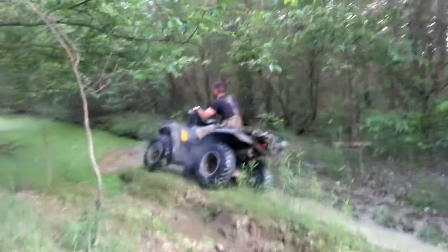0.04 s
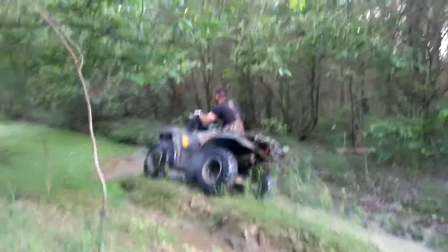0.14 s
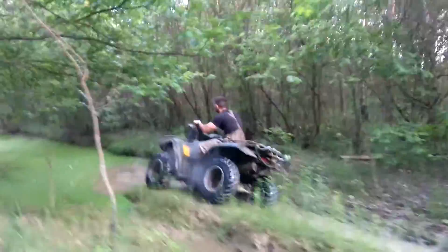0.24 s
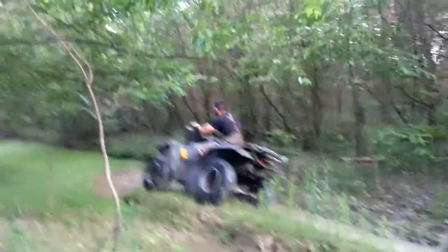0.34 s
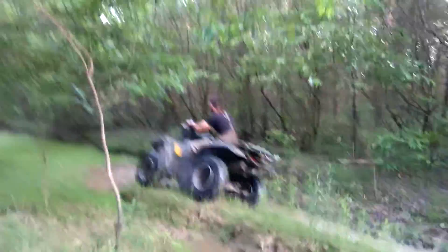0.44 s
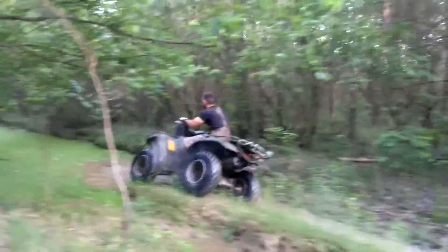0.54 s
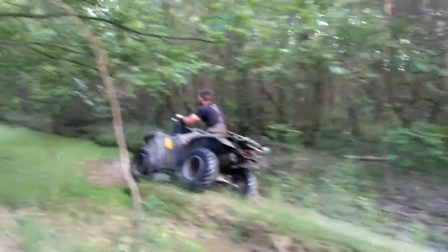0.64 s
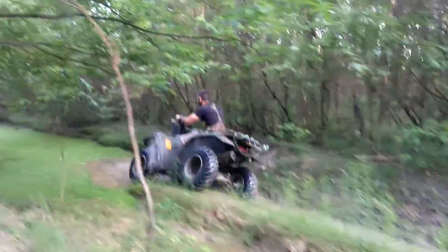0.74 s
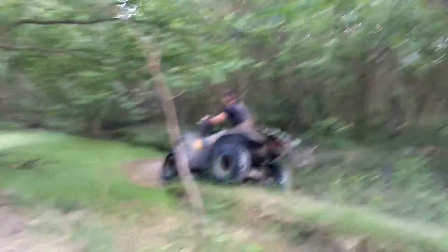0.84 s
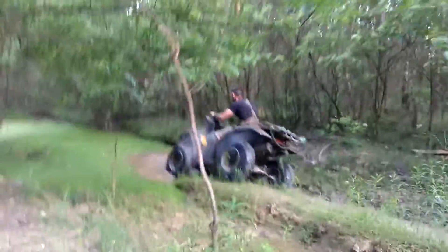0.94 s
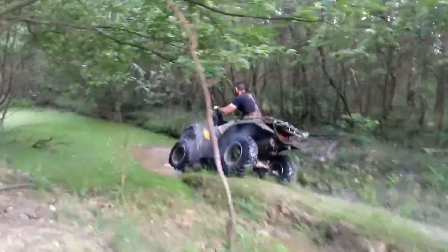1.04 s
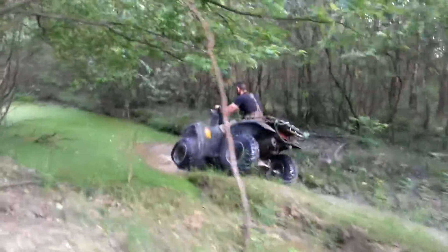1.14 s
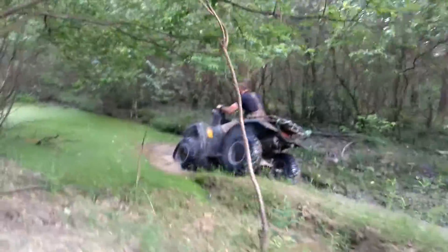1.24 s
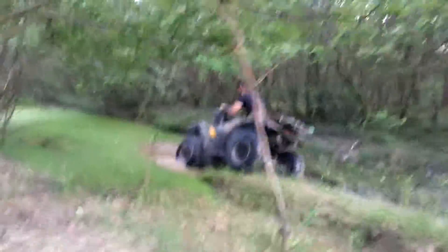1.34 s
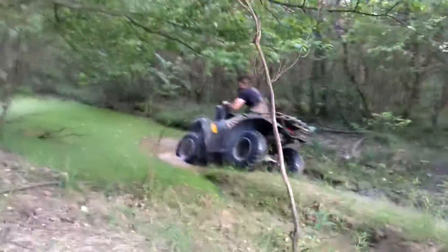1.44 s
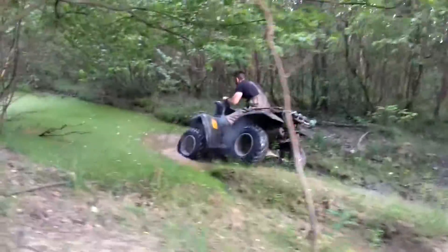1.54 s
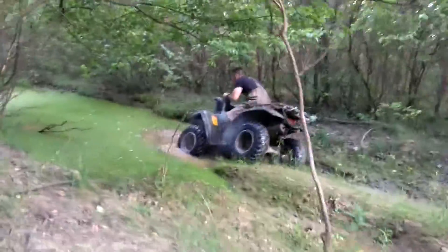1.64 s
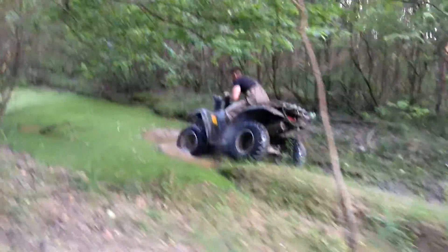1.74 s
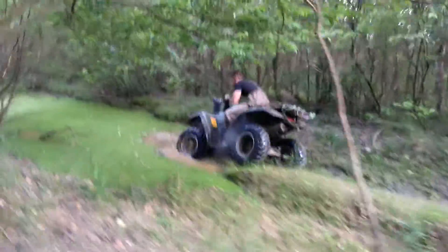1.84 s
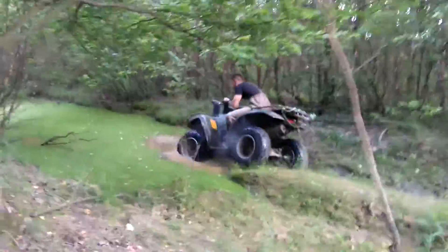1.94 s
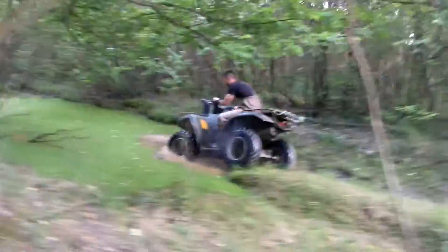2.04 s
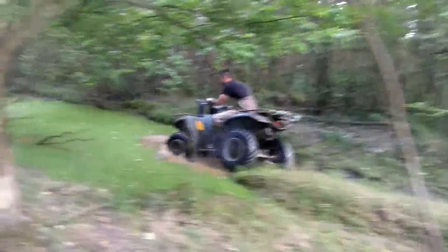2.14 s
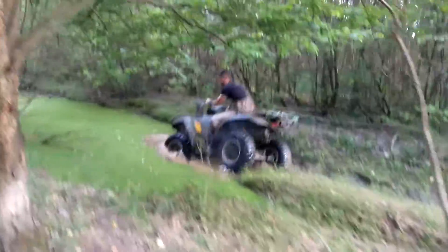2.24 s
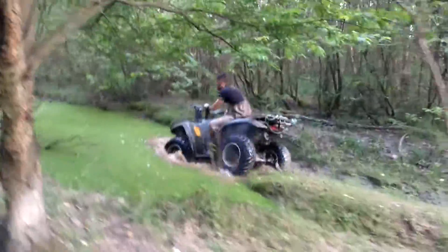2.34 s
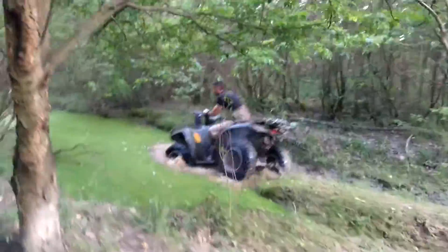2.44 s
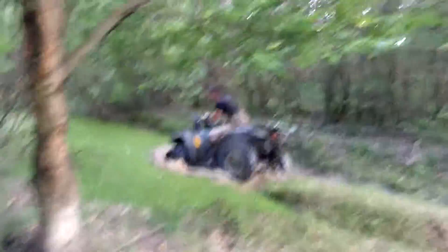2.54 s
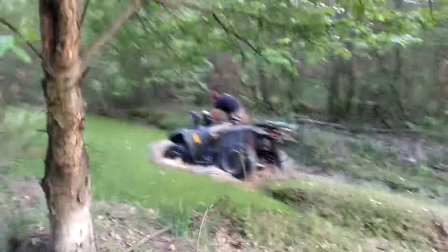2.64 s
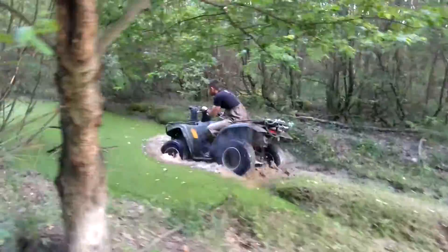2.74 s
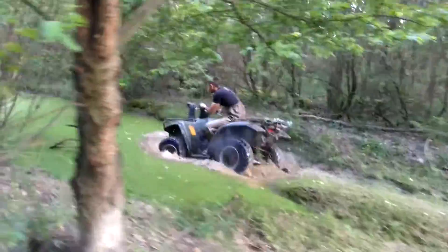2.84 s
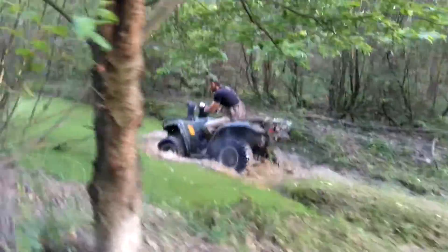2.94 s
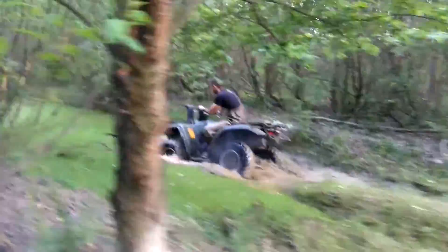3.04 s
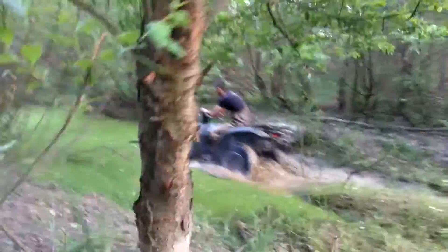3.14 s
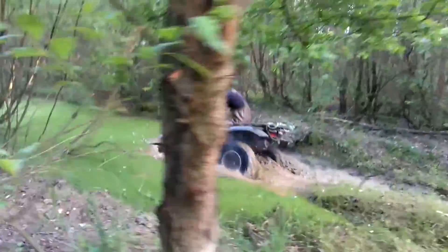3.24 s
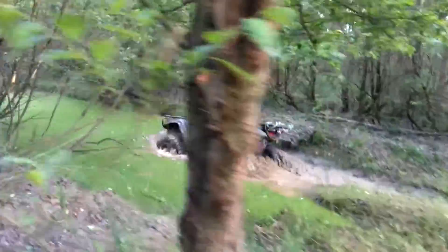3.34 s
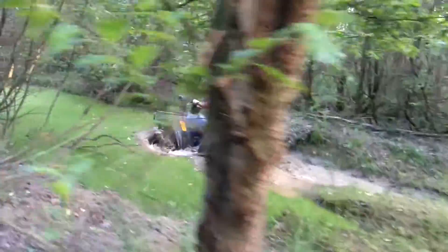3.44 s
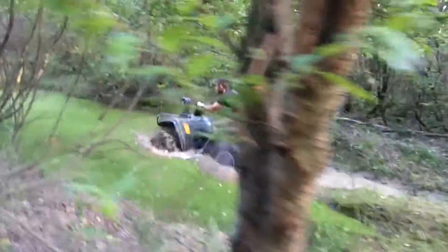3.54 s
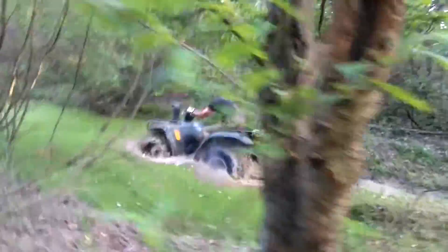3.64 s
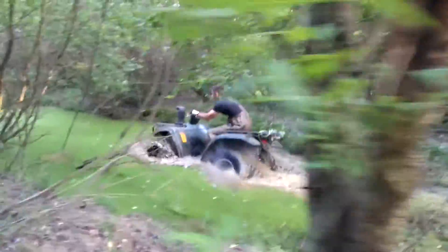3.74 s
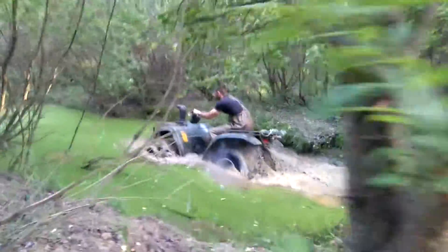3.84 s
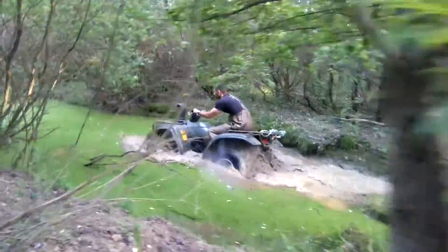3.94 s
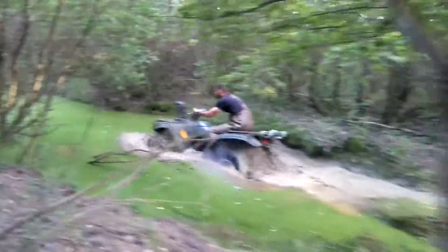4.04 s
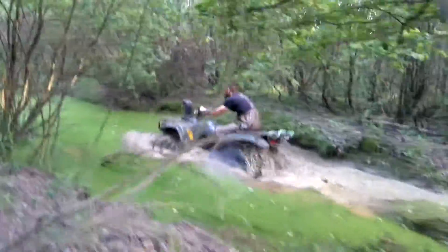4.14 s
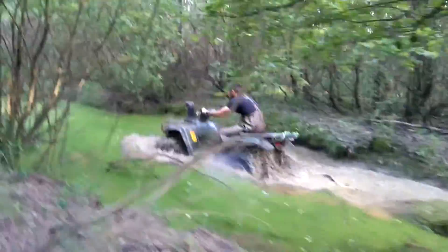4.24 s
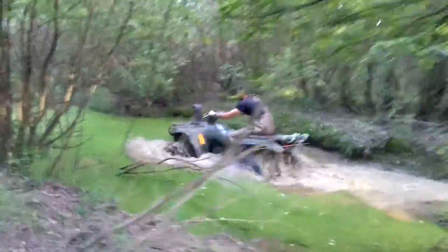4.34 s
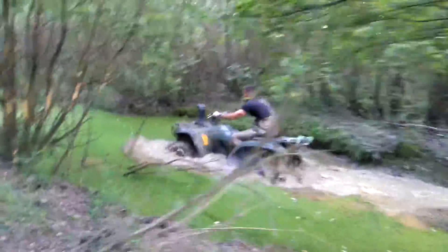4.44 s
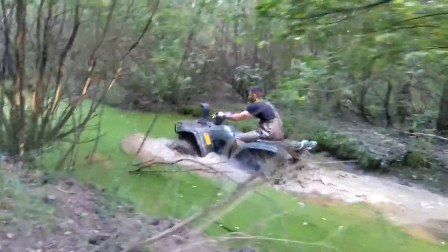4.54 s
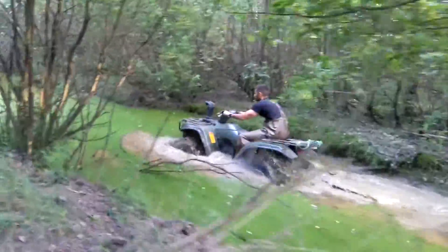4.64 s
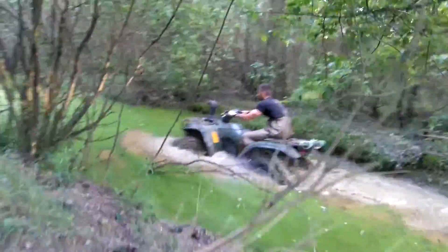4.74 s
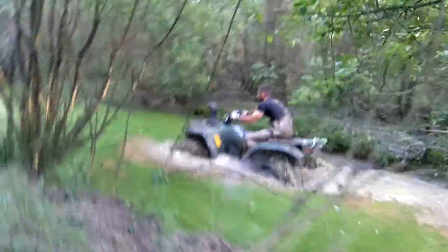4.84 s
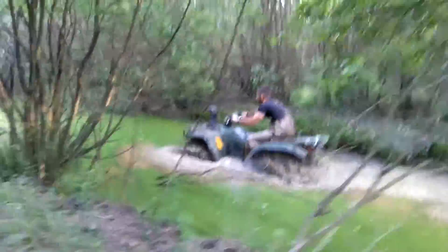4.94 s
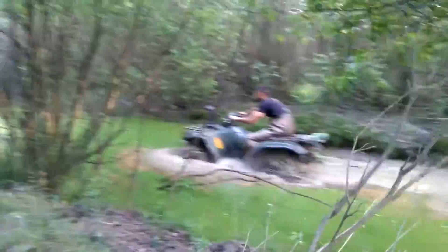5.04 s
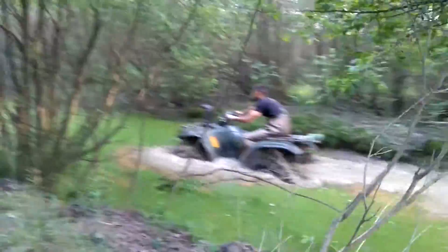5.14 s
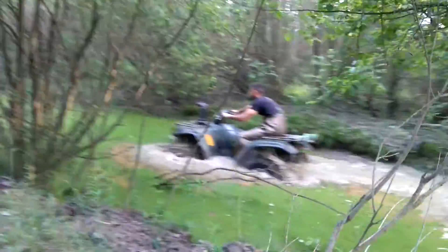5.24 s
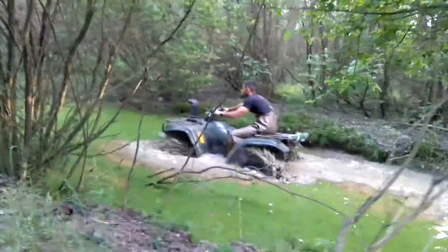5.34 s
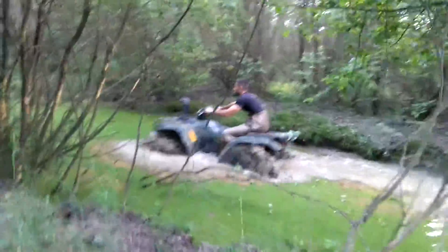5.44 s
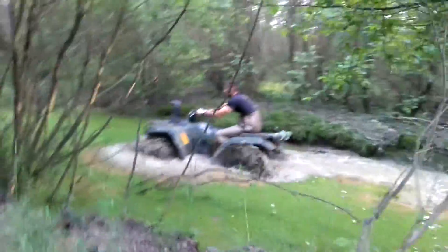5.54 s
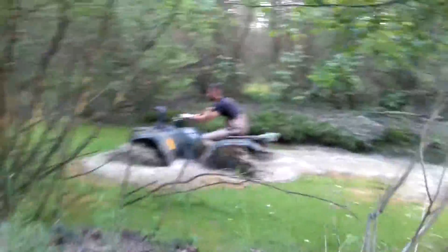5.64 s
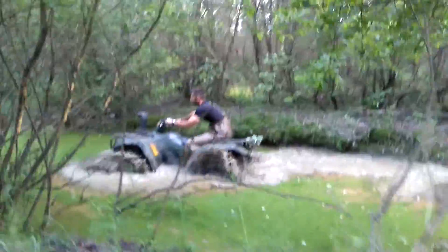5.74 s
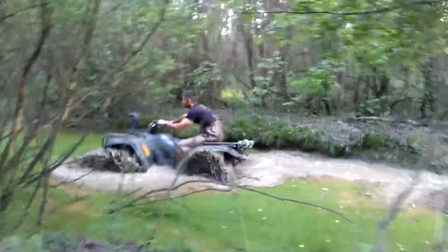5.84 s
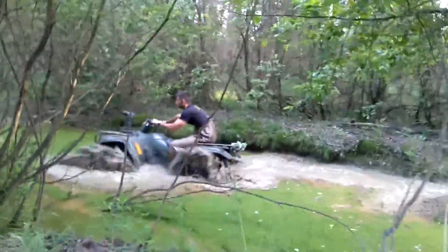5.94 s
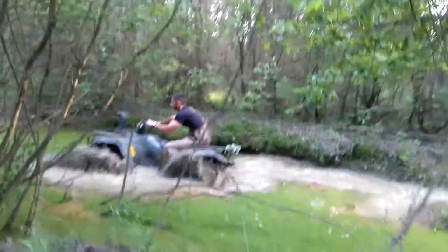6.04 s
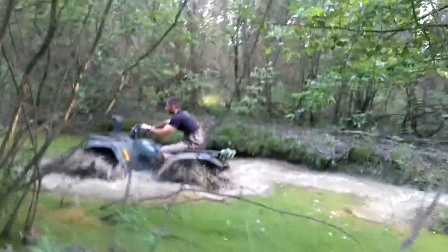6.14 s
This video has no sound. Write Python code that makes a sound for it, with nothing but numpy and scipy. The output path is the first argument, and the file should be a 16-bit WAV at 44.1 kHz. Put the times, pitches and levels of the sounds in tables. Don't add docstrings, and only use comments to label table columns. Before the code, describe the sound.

A single-cylinder quad bike blips its throttle twice, knocking and popping between, then roars hard into muddy water with churning spray in a wood.

```python
import sys
import numpy as np
from scipy import signal
from scipy.fft import rfft, irfft, next_fast_len
from scipy.io import wavfile
from scipy.ndimage import uniform_filter1d

SR = 44100
rng = np.random.default_rng(int(sys.argv[2]) if len(sys.argv) > 2 else 0)


def wav_record(signal):
    frames = np.transpose(np.atleast_2d(signal))
    bounded = np.clip(frames, -1, 1)
    quanta = np.round(bounded * 32767).astype(np.int16)
    wavfile.write(sys.argv[1], SR, quanta)


def amplitude_ratio(level_db):
    exponent = np.asarray(level_db, float) / 20
    return 10 ** exponent


N = 273420
TIME = np.arange(N) / SR
SIZE = next_fast_len(N + SR // 2)
HZ = np.arange(SIZE // 2 + 1) * SR / SIZE + 1e-3

ASPECT_S = [
    .3,
    .9,
    2.0,
    2.8,
    3.2,
    3.75,
    4.4,
    5.0,
    5.5,
    6.05,
]
# clean orders, bark, rasp, hiss and wash, all in dB.
CARRY = [(-16, -14.5, -27, -26.5, -33), (-15.5, -13.5, -26, -29.5, -31), (-16.5, -15.5, -24, -27, -32),
         (-14.5, -13, -17.5, -21.5, -27.5), (-15, -20.5, -17.5, -19, -23), (-21, -19, -17.5, -18.5, -18.5),
         (-21, -21.5, -18.5, -15.5, -18), (-19.5, -18, -19, -18.5, -17.5),
         (-17.5, -21, -22.5, -19.5, -16.5), (-16.5, -17, -22.5, -21, -21)]
# drum in dB, pipe in dB, frame in dB, bark roughness (0-1),
# left-right balance in dB.
KNOCK = [(-41, -23.5, -35, 0.64, 0), (-31.5, -23.5, -40.5, 0.66, 0.5), (-39.5, -25, -41.5, 0.76, 2.5),
         (-44, -23.5, -46, 0.34, 0), (-36, -27, -41, 0.7, 1), (-38, -28.5, -26.5, 0.15, -3.5),
         (-28.5, -27, -27.5, 0.06, -3), (-30.5, -26.5, -31, 0.13, -0.5), (-39, -48, -31, 0.2, -1),
         (-36, -44, -36, 0.14, -2.5)]
# pitch in Hz, width in Hz, level in dB.
ON_BANK = [(810, 350, 17), (970, 150, 0), (1530, 320, 10.5), (2400, 250, 14), (2780, 83, -25),
           (4860, 110, 11), (7080, 100, -39)]
# pitch in Hz, level in dB per Hz.
JET_COLOUR = [(240, 18), (400, 5.5), (867, 6.5), (1090, 9), (1590, 2.5), (2190, -3), (2510, -1.5),
              (8060, 1), (12700, -17), (14300, -13), (15000, -49)]
EVEN_DB = 1.2


def in_time(rows):
    s, *columns = np.transpose(rows)
    return [np.interp(TIME, s, column) for column in columns]


def by_aspect(rows):
    return in_time(np.column_stack([ASPECT_S, rows]))


def aspect_shares():
    return [np.interp(TIME, ASPECT_S, row) for row in np.eye(len(ASPECT_S))]


def at_hz(points, hz=HZ):
    given_hz, value = np.array(points).T
    return np.interp(np.log(hz), np.log(given_hz), value)


def through(x, response):
    return irfft(rfft(x, SIZE) * response, SIZE)[..., :N]


def modes(rows, turn=-1, hz=HZ):
    return sum(turn ** k * amplitude_ratio(db) * 1j * hz * width / (at ** 2 - hz ** 2 + 1j * hz * width)
               for k, (at, width, db) in enumerate(rows))


def band(x, low_hz, high_hz, order=2):
    return signal.sosfilt(signal.butter(order, [low_hz, high_hz], "band", fs=SR, output="sos"), x)


def evened(x, level_db):
    power = uniform_filter1d(uniform_filter1d(np.atleast_2d(x)[0] ** 2, SR // 9), SR // 9)
    return x * amplitude_ratio(level_db) / np.sqrt(power + 1e-12)


def per_cycle(number, spread_db):
    return amplitude_ratio(spread_db * rng.standard_normal(number[-1] + 1))[number]


def burst(since, rate, rise_s, fall_s):
    s = np.maximum(since, 0) / rate
    return (1 - np.exp(-s / rise_s)) * np.exp(-s / fall_s)


def gritty(shape, grit_db, grain):
    jumps = np.repeat(rng.standard_normal(N // grain + 1), grain)[:N]
    return rng.standard_normal(shape) * amplitude_ratio(grit_db * jumps)


def opening():
    # time in seconds, opening (0-1).
    throttle = [(0, 0.76), (.09, 0.89), (.61, 0.86), (.66, 0.67), (1.4, 0.43), (1.62, 0.85), (1.75, 0.96),
                (2.22, 0.91), (2.27, 0.4), (2.66, 0.2), (2.715, 0.89), (6.2, 1)]
    return np.clip(in_time(throttle)[0], 0, 1)


def driven(full_db, layer):
    # time in seconds, level in dB.
    effort = [(0, -38.5), (.12, -23), (.45, -17.5), (.6, -17.5), (.66, -26), (.76, -23), (.95, -30.5),
              (1.4, -37.5), (1.52, -36.5), (1.62, -32), (1.78, -21.5), (2.05, -17), (2.21, -18),
              (2.27, -23), (2.6, -32.5), (2.73, -22), (3.1, -17), (6.2, -17)]
    follows = dict(clean=0.81, drum=0.26, pipe=0.15, bark=1, rasp=0.73, hiss=0.93, wash=0.81)
    shut_db = dict(clean=-3, drum=12, pipe=-4, bark=-3.5, rasp=-12.5, hiss=-12.5, wash=9.5)
    below_full_db = in_time(effort)[0] + 17
    return full_db + follows[layer] * below_full_db + shut_db[layer] * (1 - opening())


def crank():
    # time in seconds, firings per second.
    speed = [(0.0, 11.35), (0.13, 15.71), (0.3, 21.66), (0.45, 24.92), (0.61, 25.8), (0.72, 20.84),
             (0.95, 18.07), (1.22, 13.83), (1.5, 12.18), (1.64, 12.28), (1.8, 18.7), (1.95, 23.05),
             (2.08, 25.58), (2.22, 25.34), (2.35, 20.52), (2.52, 17.22), (2.68, 18.25), (2.82, 23.53),
             (2.96, 28.7), (3.25, 32.53), (3.588, 37.02), (4.05, 38.6), (4.557, 38.17), (5.138, 38.9),
             (5.365, 41.75), (5.665, 40.94), (6.2, 40.92)]
    flywheel_s, first_cycle = 0.05, -0.1987
    push_cycle, push_latest_s = 0.41, 0.043
    rate = uniform_filter1d(in_time(speed)[0], round(flywheel_s * SR), mode="nearest")
    delay_s = np.interp(TIME, [2.8, 3.2], [0, 0.35 / 343])
    turned = np.cumsum(rate) / SR + first_cycle + 1 - rate * delay_s
    return turned % 1, np.minimum(push_cycle, push_latest_s * rate), rate, turned.astype(int)


def aspects(x, valley_db):
    # pitch in Hz, width in Hz, level in dB.
    revving = [(740, 170, 19), (980, 73, 13), (1660, 370, 15), (2300, 270, 15.5), (2780, 46, 14),
               (3880, 100, -11), (5040, 73, 10), (7160, 290, 6)]
    # pitch in Hz, width in Hz, level in dB.
    nosing_in = [(900, 64, -9), (1280, 580, 11.5), (2220, 84, 13.5), (3000, 170, 4), (3800, 40, -28),
                 (5100, 150, -35), (6100, 22, -19)]
    # pitch in Hz, width in Hz, level in dB.
    dropping = [(990, 130, -18), (1540, 120, 3), (2340, 94, 6), (2730, 150, 6.5), (4230, 60, -4),
                (4770, 180, 4), (6200, 46, -2), (7500, 57, 6)]
    # pitch in Hz, width in Hz, level in dB.
    wading = [(865, 32, 9), (1680, 310, 9.5), (2380, 81, 8), (3140, 430, 7.5), (3800, 640, 5.5),
              (5040, 80, 12), (5930, 32, -14), (7380, 63, -16)]
    # pitch in Hz, width in Hz, level in dB.
    sinking = [(1647, 47, 8.5), (1924, 150, 9.5), (2560, 92, 7.5), (3320, 100, -5), (3840, 510, 1),
               (4640, 370, 7), (5240, 170, 3), (6100, 190, 0)]
    # pitch in Hz, width in Hz, level in dB.
    deep = [(822, 99, 19.5), (1250, 63, 14), (2010, 220, 9.3), (2590, 280, 4.7), (3210, 310, 10.7),
            (4000, 240, 12), (5080, 290, 4.5), (6100, 210, 2)]
    # pitch in Hz, width in Hz, level in dB.
    ploughing = [(883, 23, 16), (1624, 19, 14), (2480, 46, 12), (3300, 79, 6.7), (3960, 140, 5.5),
                 (4570, 330, 3), (5100, 140, 3.9), (5900, 130, 2)]
    # pitch in Hz, width in Hz, level in dB.
    churning = [(660, 57, 6.5), (415, 66, -3), (1660, 133, -5), (1910, 280, 11), (2510, 230, 4),
                (3500, 780, 10), (4480, 130, 13.5), (5130, 110, 15), (6540, 230, -17)]
    # pitch in Hz, width in Hz, level in dB.
    leaving = [(664, 90, -7), (810, 130, 14.5), (1670, 170, 4), (2330, 140, 2), (3030, 110, -4),
               (4050, 970, 6), (6800, 110, -11)]
    # pitch in Hz, width in Hz, depth
    hollow = [(3570, 300, 0.2), (1910, 200, 0), (1880, 120, 0.1), (3500, 240, 0.1), (2750, 180, 0.5),
              (2160, 120, 0.4), (1480, 820, 0.34), (1460, 170, 0.72), (3530, 210, 0.5), (2140, 270, .95)]
    tables = [revving, ON_BANK, nosing_in, dropping, wading, sinking, deep, ploughing, churning, leaving]
    out = np.zeros_like(x)
    for share, table, (dip_hz, width, depth) in zip(aspect_shares(), tables, hollow):
        heard = np.flatnonzero(share)
        start, end = max(heard[0] - SR // 8, 0), heard[-1] + 1
        size = next_fast_len(end - start + SR // 4)
        hz = np.arange(size // 2 + 1) * SR / size + 1e-3
        colour = modes(table, turn=0.9, hz=hz) + amplitude_ratio(valley_db + at_hz(JET_COLOUR, hz))
        colour = colour * (1 - np.clip(depth, 0, 1) * modes([(dip_hz, width, 0)], hz=hz))
        coloured = irfft(rfft(x[:, start:end], size) * colour, size)[:, :end - start]
        out[:, start:end] += np.sqrt(share[start:end]) * coloured
    return out


def wood(x):
    out = np.zeros_like(x)
    lags = (rng.uniform(0.015, 0.16, 14) * SR).astype(int)
    for k, lag in enumerate(lags):
        fade = amplitude_ratio(-60 * lag / SR / 0.5)
        out[k % 2, lag:] += (-1) ** (k // 2) * fade * x[0, :-lag]
    return band(out, 97, 3800, order=1)


def passing(pair):
    # time in seconds, length in seconds, pitch in Hz, width in Hz, gain (-1 cancels).
    narrow_bands = [(2.638, 0.057, 1800, 200, -0.48), (2.85, 0.19, 690, 90, -.7), (2.898, 0.16, 3600, 250, -0.69),
                    (3.22, 0.11, 2850, 100, 1.5), (3.27, 0.23, 90, 37, -.7), (3.43, 0.098, 2750, 130, -.9),
                    (3.6, 0.23, 1620, 46, 0.87), (2.66, .2, 427, 82, 0.74), (4.55, 0.45, 514, 78, 0.46),
                    (3.57, 0.28, 2400, 90, 0.32), (3.595, 0.17, 1980, 90, 0.057), (3.3, 0.59, 630, 250, -.4),
                    (3.6, 0.34, 495, 93, 0.96), (5.7, 0.22, 430, 110, 0.63), (1.45, 0.44, 600, 270, 0.21),
                    (3.65, 0.094, 3600, 270, -1.4), (3.5, 0.17, 2100, 140, -1.1), (3.833, 0.33, 2600, 120, 0.29),
                    (4.634, 0.18, 1200, 170, 0.63), (4.88, 0.22, 2000, 300, 0.0037), (5.366, 0.098, 620, 50, 1.3),
                    (5.47, 0.23, 4000, 120, -.85), (5.55, .1, 4600, 150, -0.59), (5.68, .12, 4100, 220, -0.8),
                    (5.668, 0.073, 3800, 140, -0.99), (5.85, 0.21, 2040, 110, -.8),
                    (5.995, 0.091, 3250, 140, -.85), (6.08, 0.28, 2400, 120, -0.49),
                    (6.125, 0.061, 3200, 230, -0.52), (6.157, 0.081, 2950, 220, -0.44),
                    (0.64, 0.38, 470, 110, -0.31), (.15, 0.1, 450, 79, -0.42), (0.56, .35, 3800, 500, -0.23)]
    out = pair.copy()
    for s, length, hz, width, gain in narrow_bands:
        start, end = max(round((s - length) * SR), 0), min(round((s + length) * SR), N)
        fade = np.clip(2 - 2 * abs(np.arange(start, end) / SR - s) / length, 0, 1)
        peak = signal.iirpeak(hz, hz / width, fs=SR)
        out[:, start:end] += max(gain, -1) * fade * signal.lfilter(*peak, out[:, start:end])
    return out


def splashes():
    knots = rng.standard_normal(200)
    return np.interp(TIME * 9 * 2, np.arange(200), knots)


def wash(level_db):
    # pitch in Hz, level in dB per Hz.
    wash_colour = [(240, -81), (400, 0.5), (880, -14.5), (2390, 4.5), (4330, -5.5), (7810, -3),
                   (12500, -13), (14300, -12), (15000, -76)]
    wet_share = [0.1, 0.12, 0.88, 0.23, 0.97, 0.58, 0.64, 0.65, .9, 0.27]
    falls = rng.random((2, N)) < 1500 / SR
    drops = falls * amplitude_ratio(4.7 * np.minimum(rng.exponential(1, (2, N)), 4))
    spray = rng.standard_normal((2, N)) * (1 + 1.17 * uniform_filter1d(drops, 12) * 4.7)
    tilt = amplitude_ratio(at_hz(wash_colour) - at_hz(JET_COLOUR)) * (HZ > 300)
    sound = aspects(through(spray, tilt), valley_db=10.5)
    splash_db = 3.5 * splashes() * by_aspect(wet_share)[0]
    return evened(sound, level_db + splash_db)


def clinks(events, body):
    ticks = np.zeros(N)
    for s, peak_db in events:
        at = round(s * SR)
        ticks[at:at + 2] += amplitude_ratio(peak_db + 28) * np.array([1, -0.4])
    return through(ticks, modes(body, turn=1.0)) * [[1], [0.4]]


def loose_shield():
    # time in seconds, peak in dB.
    shield_clinks = [(0.0484, -30), (0.1191, -22), (0.181, -13), (0.2155, -18), (0.5691, -26), (2.549, -27),
                     (2.9402, -10), (2.9756, -13), (3.0654, -15)]
    # pitch in Hz, width in Hz, level in dB.
    shield = [(5110, 54, 12.5), (5050, 120, 0), (2530, 110, -12)]
    return clinks(shield_clinks, shield)


def flung_stones():
    # time in seconds, peak in dB.
    stones = [
        (0.9494, -29),
        (2.8908, -15),
        (5.1771, -10),
        (5.3747, -12),
    ]
    # pitch in Hz, width in Hz, level in dB.
    guard = [(2300, 110, 20), (2540, 180, 9), (7000, 3000, -13)]
    return clinks(stones, guard)


def pops():
    # time in seconds, peak in dB.
    fuel_pops = [(0.729, -5), (0.755, -20), (0.792, -14), (0.842, -3.5), (0.861, -33), (1.272, -11),
                 (2.337, -5.5), (2.398, -2)]
    puffs = np.zeros(N)
    for s, peak_db in fuel_pops:
        at = round(s * SR)
        puffs[at:at + 200] += amplitude_ratio(peak_db - 6.5) * rng.standard_normal(200) * np.exp(-np.arange(200) / 28.0)
    return band(through(puffs, modes(ON_BANK, turn=0.65)), 400, 3600) * [[1], [0.3]]


def zip_note(place, rate, number):
    # time in seconds, pitch in Hz, level in dB.
    notes_heard = [(0, 2620, -27.5), (.6, 2490, -16), (.7, 2530, -50), (1.7, 2400, -48), (2.1, 2880, -28),
                   (2.3, 2900, -42), (2.7, 2680, -34), (2.9, 2430, -30), (3.12, 3440, -12),
                   (3.26, 3750, -11.5), (3.47, 3960, -9), (3.6, 3950, -19), (3.9, 3500, -20),
                   (4.4, 3300, -18), (5.0, 3300, -27), (5.5, 3300, -26), (6.2, 4160, -22)]
    note_hz, note_db = in_time(notes_heard)
    since = place - 0.0025 * rate
    tone = np.sin(2 * np.pi * note_hz * per_cycle(number, 0.081) * since / rate)
    shape = burst(since, rate, 0.0012, 0.0021) * per_cycle(number, EVEN_DB)
    return amplitude_ratio(note_db + 8.0) * tone * shape * [[1], [0.5]]


def valve_zip(place, rate, number):
    s = place / rate
    start_hz, top_hz, climb_s = 1450 * per_cycle(number, 0.79), 3950 * per_cycle(number, 0.83), 0.0024
    turns = top_hz * s - (top_hz - start_hz) * climb_s * (1 - np.exp(-s / climb_s))
    return np.sin(2 * np.pi * turns) * burst(place, rate, 0.000096, 0.0028)


def jet(place, push_at, rate, number):
    slap_share = [.4, .25, .25, .3, .15, .1, .1, .1, .1, .1]
    zip_share = [0.28, 0.41, 0.92, 0.93, 1.24, 1.13, 1.2, 1.25, 0.85, 0.44]
    rasp_db, hiss_db, wash_db = by_aspect(CARRY)[2:]
    throttle_open = opening()
    open_valve = np.clip((0.74 - place) / 0.2, 0.12, 1)
    strength = per_cycle(number, 0.47) * throttle_open
    crack = burst(place, rate, 0.0002, 0.004) * strength
    swell = burst(place - push_at, rate, 0.0042, 0.0044) * per_cycle(number, 1.9)
    slap_at = np.minimum(push_at, 0.024 * rate)
    slap = burst(place - slap_at, rate, 0.00066, 0.0081) * per_cycle(number, 2 * EVEN_DB)
    slap = slap * by_aspect(slap_share)[0]
    stream = burst(place, rate, 0.003, 0.077) * open_valve
    noise = gritty((2, N), 1.7, grain=40)
    noise[1] = 1.5 * noise[1] + 0.21 * np.roll(noise[0], 9)
    zipper = valve_zip(place, rate, number) * strength * per_cycle(number, 0.54)
    drive = 0.86 * crack * np.sign(noise)
    drive = drive + (0.37 * swell + slap + 0.4 * stream) * noise
    drive = drive + 0.54 * (1 - throttle_open) * noise
    drive = drive + by_aspect(zip_share)[0] * zipper * [[1], [0.4]]
    gas = aspects(drive, valley_db=-5.0)
    rasp = evened(band(gas, 1414, 2910, order=3), driven(rasp_db, "rasp"))
    hiss = evened(band(gas, 3360, 13000, order=3), driven(hiss_db, "hiss"))
    return rasp + hiss + wash(driven(wash_db, "wash") - 4.0)


def snatch_db():
    # time in seconds, extra shake in dB.
    snatches = [
        (0.0, 3),
        (.75, 15.5),
        (1.52, 10),
        (2.35, 21.5),
    ]
    rise_s, fall_s = 0.27, 0.63
    return sum(db * np.interp(TIME, [at - rise_s, at, at + fall_s], [0, 1, 0]) for at, db in snatches)


def ring_gain(rows, hz):
    return np.sqrt(sum(amplitude_ratio(2 * db) / (1 + (2 * (hz - at) / width) ** 2) ** 2 for at, width, db in rows))


def orders(place, rate, number, count=24):
    # pitch in Hz, width in Hz, level in dB.
    revving = [(100, 50, -33), (148, 53, -23.5), (203, 63, -28.5), (275, 36, -21.5), (326, 21, -26),
               (410, 34, -34.5), (610, 97, -47)]
    # pitch in Hz, width in Hz, level in dB.
    bank = [(113, 58, -30.5), (149, 61, -28), (216, 16, -26), (279, 66, -23), (372, 8.4, -29.5),
            (550, 71, -48)]
    # pitch in Hz, width in Hz, level in dB.
    nosing = [(99, 51, -34.5), (143.3, 26, -26), (197, 70, -29.5), (276, 47, -24), (367, 37, -39),
              (432, 22, -29.5), (530, 67, -39)]
    # pitch in Hz, width in Hz, level in dB.
    dropping = [(97, 54, -32.5), (154, 40, -23), (220, 61, -26), (306, 20, -23.5), (371, 17, -26.5),
                (503, 53, -35.5)]
    # pitch in Hz, width in Hz, level in dB.
    wading = [(64, 25, -42), (126, 22, -54), (166, 38, -22.5), (288, 42, -28.5), (351, 23, -28),
              (483, 68, -37.5), (704, 200, -66)]
    # pitch in Hz, width in Hz, level in dB.
    sinking = [(90, 66, -35.5), (150, 45, -33.5), (204, 24, -17.5), (333.5, 20, -28), (504, 25, -37),
               (618, 22, -33), (745, 30, -35), (825, 54, -43)]
    # pitch in Hz, width in Hz, level in dB.
    deep = [(85.4, 62, -34), (155, 31, -33), (271, 27, -29), (378, 70, -26.5), (469, 81, -28),
            (568, 34, -30), (730, 32, -30), (804, 41, -25), (880, 31, -53)]
    # pitch in Hz, width in Hz, level in dB.
    ploughing = [(80, 49, -45), (158, 85, -27), (240, 30, -28), (266, 41, -19.5), (378, 45, -29),
                 (463, 34, -30), (570, 25, -35.5), (720, 41, -54), (870, 27, -43)]
    # pitch in Hz, width in Hz, level in dB.
    churning = [(82, 30, -56), (152, 87, -24), (288, 65, -20.5), (365, 140, -26.5), (502, 29, -31),
                (524, 37, -35), (695, 40, -35.5), (781, 19, -27), (932, 32, -26.5)]
    drone_s = [.45, .8, 1.55, 2.0, 2.3, 2.8, 3.101, 3.7, 4.399, 5.0, 5.5]
    rides = [.5, 0, 0, .5, 0, .5, 1, 1, 0, 0, 0]
    drones = [revving, bank, bank, nosing, nosing, dropping, wading, sinking, deep, ploughing, churning]
    step = 256
    coarse = np.arange(0, N, step)
    at = place - 0.38 - 0.004 * rate
    at = at + uniform_filter1d(per_cycle(number, 0.02), 800)
    shares = [np.interp(coarse / SR, drone_s, row) for row in np.eye(len(drone_s))]
    speeds = [rate[round(s * SR)] ** ride * rate[::step] ** (1 - ride) for s, ride in zip(drone_s, rides)]
    on_land = np.interp(TIME, drone_s[5:7], [1, 0])
    out, late, lead = 0, 0, 0
    for k in range(1, count + 1):
        lead += 0.23 * np.exp(-((k - 9.1) / 1.6) ** 2)
        late += 0.17 * (k in (3, 5))
        late += 0.2 * np.cos(2 * np.pi * (k - 1) / 6) / (1 + (k / 16.7) ** 2)
        sway = uniform_filter1d(per_cycle(number, 0.7 + 0.13 * k), 800)
        size = sum(share * ring_gain(rows, k * speed) for share, rows, speed in zip(shares, drones, speeds))
        size = size * abs(1 + 0.054 * np.exp(2j * np.pi * k * 0.493))
        wave = np.cos(2 * np.pi * (k * at - late + lead * on_land))
        out = out + np.interp(np.arange(N), coarse, size) * sway * wave
    return out


def header_knock(place, rate, number):
    # time in seconds, level in dB.
    header = [(0, -38), (.6, -34), (.75, -50), (1.0, -40), (1.3, -47), (1.6, -31.5), (1.8, -28), (2.2, -44),
              (2.35, -43), (2.6, -29), (2.8, -29), (3.0, -28), (3.3, -43), (6.2, -42)]
    # pitch in Hz, width in Hz, level in dB.
    header_rings = [(258, 55, 3), (415, 120, -3.5)]
    hit = burst(place - 0.00403 * rate, rate, 0.00072, 0.001) * per_cycle(number, 0.5)
    return evened(band(through(hit, modes(header_rings)), 210, 490), in_time(header)[0])


def silencer(place, push_at, rate, number):
    # pitch in Hz, width in Hz, level in dB.
    drum_rings = [(125.3, 21.5, -0.5), (146.8, 18, 3.5), (187.2, 31, 4)]
    # pitch in Hz, width in Hz, level in dB.
    pipe_rings = [(234, 76, 3), (283.4, 61, 6), (339.8, 31.6, 1.5), (388, 11, -5.5)]
    # pitch in Hz, width in Hz, level in dB.
    frame_rings = [(42, 6.7, 4.9), (68, 41, 19.4), (98, 5.8, 17)]
    clean_db, bark_db = by_aspect(CARRY)[:2]
    drum_db, pipe_db, frame_db, rough, _ = by_aspect(KNOCK)
    rough = np.clip(rough, 0, 1)
    throttle_open = opening()
    shut = 1 - throttle_open

    crack = burst(place, rate, 0.0026, 0.0013) * per_cycle(number, 1.3)
    push = burst(place - push_at, rate, 0.00074, 0.0026) * per_cycle(number, 0.96)
    push = push * amplitude_ratio(6.5 - 4.1 * (2.5 - throttle_open))
    flow = burst(place, rate, 0.00053, 0.017) * per_cycle(number, EVEN_DB)
    flow = flow + 0.75 * per_cycle(number, EVEN_DB) * burst(place - push_at, rate, 0.00033, 0.0041)
    flow = flow + 1.1 * throttle_open * burst(place, rate, 0.00014, 0.0021)
    flow = flow + 0.026 + 0.4 * shut

    knock = (crack - push) * (1 - 0.19 * throttle_open)
    pulses = knock + (0.13 + 0.69 * shut) * flow * rng.standard_normal(N)
    drum = evened(through(pulses, modes(drum_rings) ** 2), driven(drum_db, "drum"))
    pipe = evened(band(through(pulses, modes(pipe_rings)), 246, 516), driven(pipe_db, "pipe"))
    shake = evened(band(through(pulses, modes(frame_rings)), 46, 135), frame_db + snatch_db() - 5.5)

    smooth_bark = (1 - rough) * 6.7 * throttle_open * np.gradient(crack - 0.4 * push)
    rough_bark = rough * 0.16 * flow * np.tanh(gritty((2, N), 2.8, grain=60))
    bark = band(aspects(smooth_bark + rough_bark, valley_db=-3.5), 435, 1245)
    bark = evened(bark, driven(bark_db, "bark") - 3.5)

    drone = evened(orders(place, rate, number), driven(clean_db, "clean"))
    boom = drum + pipe + header_knock(place, rate, number) + shake + drone
    return bark + boom * [[1], [0]] + [[0], [0.6]] * np.roll(boom, 220)


def scene():
    # pitch in Hz, likeness of left and right (0-1).
    likeness = [(60, 0.88), (150, 0.99), (380, 1), (940, 0.99), (2340, 0.64), (5860, 0.22), (14700, 0.24)]
    # pitch in Hz, left over right in dB.
    lean = [(60, -4), (130, -4.5), (290, -3), (630, -3.5), (1390, -2.5), (3050, 0.5), (6680, 8),
            (14700, -3.5)]
    engine = place, _, rate, number = crank()
    exhaust = silencer(*engine) + jet(*engine) + zip_note(place, rate, number) + pops()
    mid, side = exhaust + loose_shield() + flung_stones()
    alike = np.clip(at_hz(likeness), 0, 1)
    side = through(side, np.sqrt((1 - alike) / (1 + alike)))
    pair = np.array([mid + side, mid - side])
    pair = through(pair, amplitude_ratio(at_hz(lean) * [[0.5], [-0.5]]))
    pan_db = by_aspect(KNOCK)[-1]
    pair = pair * amplitude_ratio(0.31 * (pan_db - pan_db.mean()) * [[0.5], [-0.5]])
    return passing(pair + amplitude_ratio(-12.5) * wood(np.array([mid, mid])))


def low_pass(x):
    return signal.sosfilt(signal.butter(12, 15260, fs=SR, output="sos"), x)


def record(dry):
    top = 0.99
    rounded = top * np.tanh(dry / top)
    cut = signal.sosfilt(signal.cheby2(10, 66, 15550, fs=SR, output="sos"), rounded)
    return low_pass(np.clip(cut, -1, 1))


dry = scene()
out = record(dry)
wav_record(out)
```